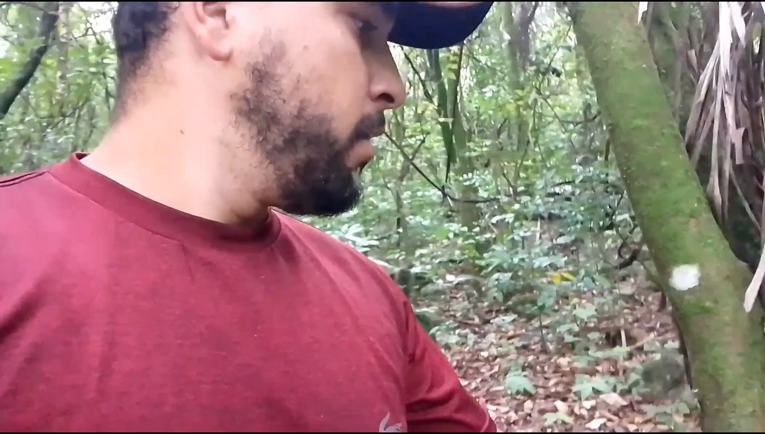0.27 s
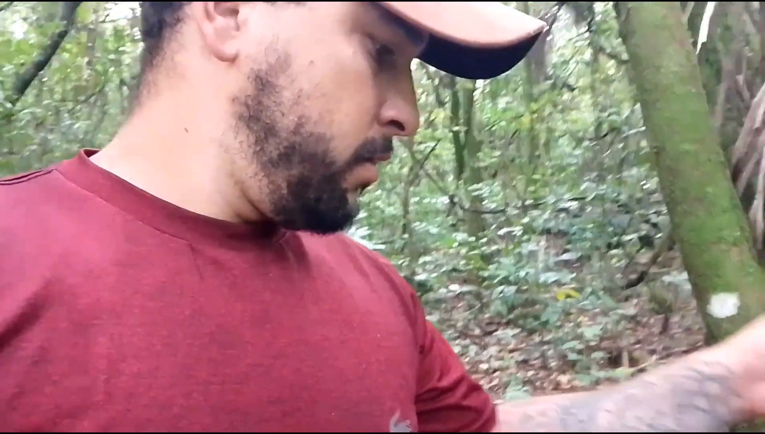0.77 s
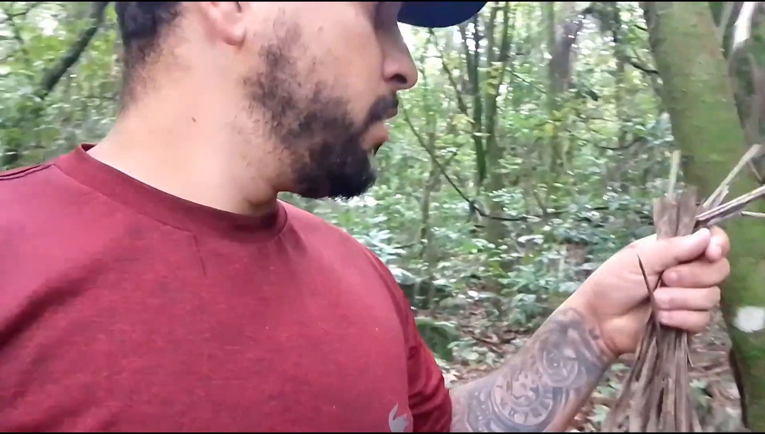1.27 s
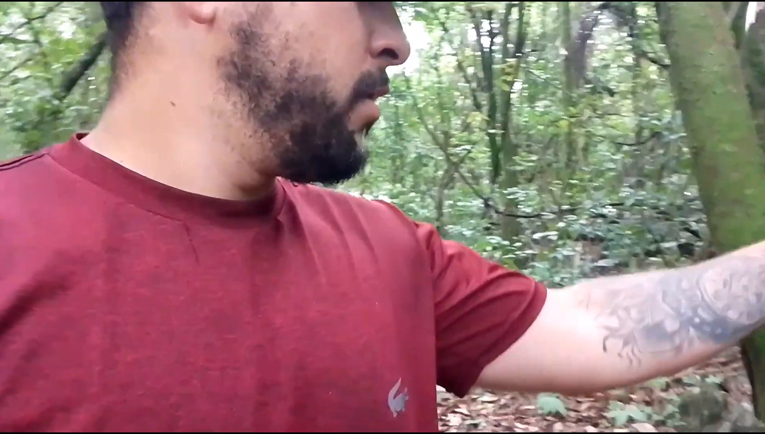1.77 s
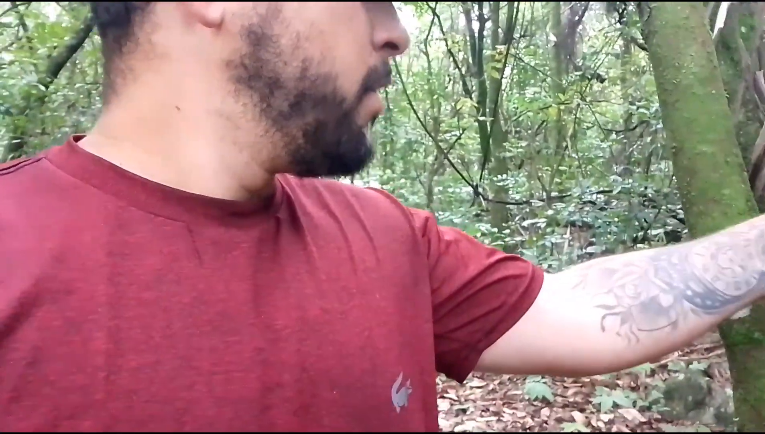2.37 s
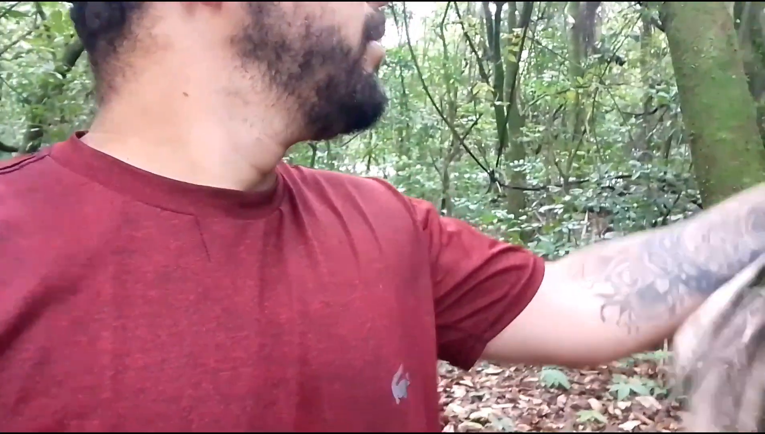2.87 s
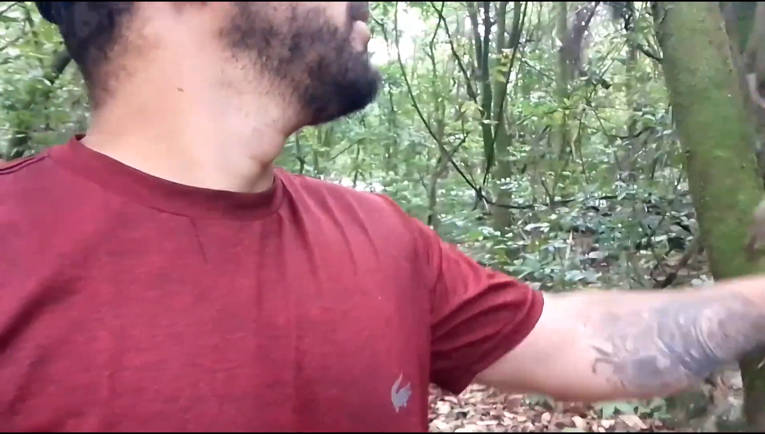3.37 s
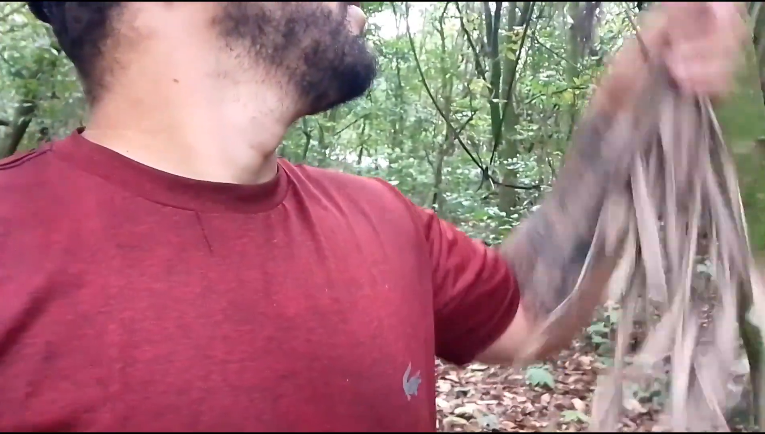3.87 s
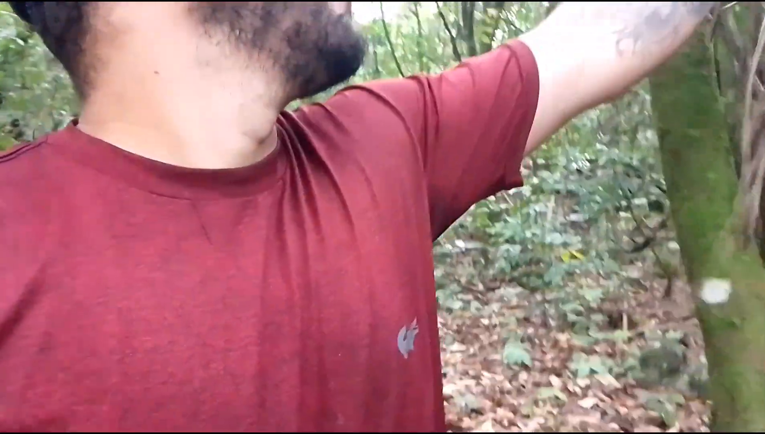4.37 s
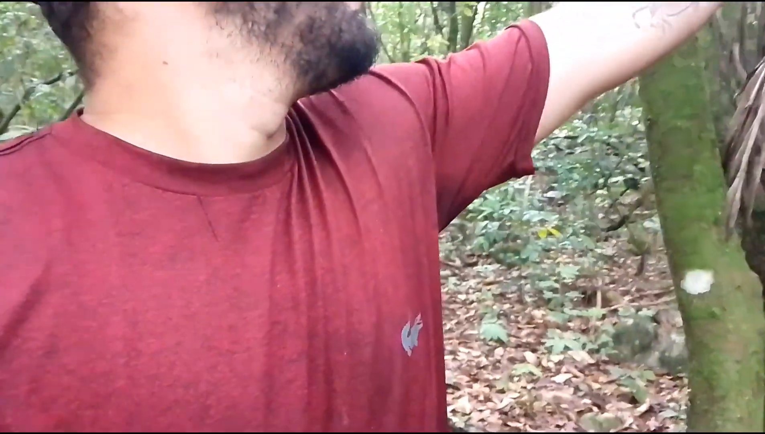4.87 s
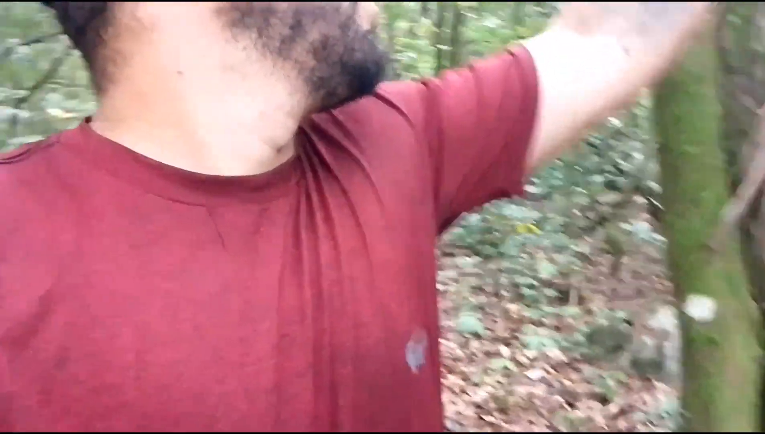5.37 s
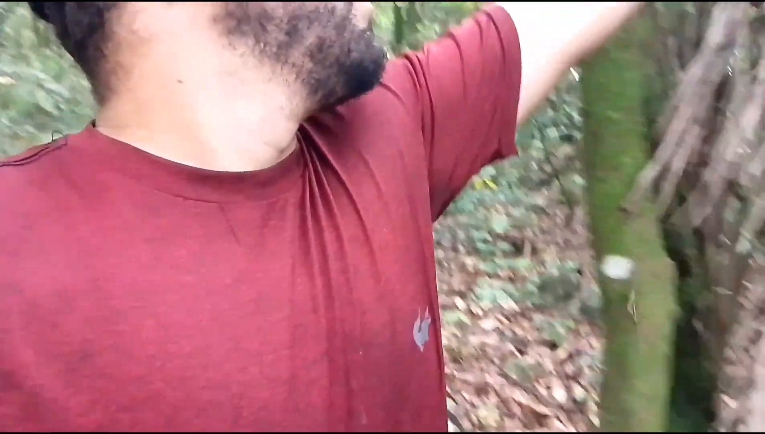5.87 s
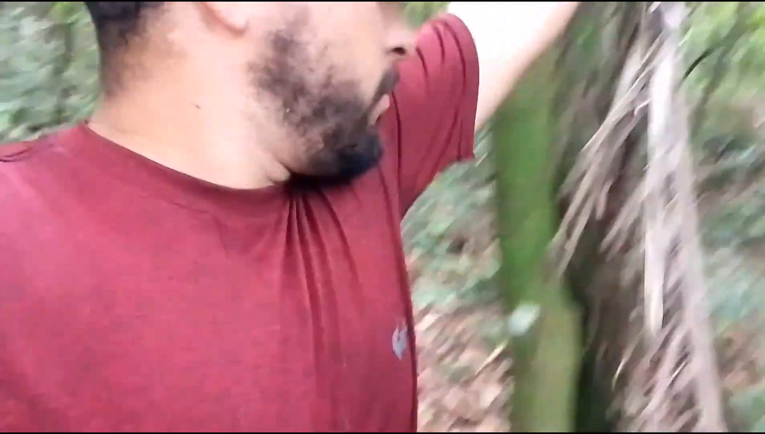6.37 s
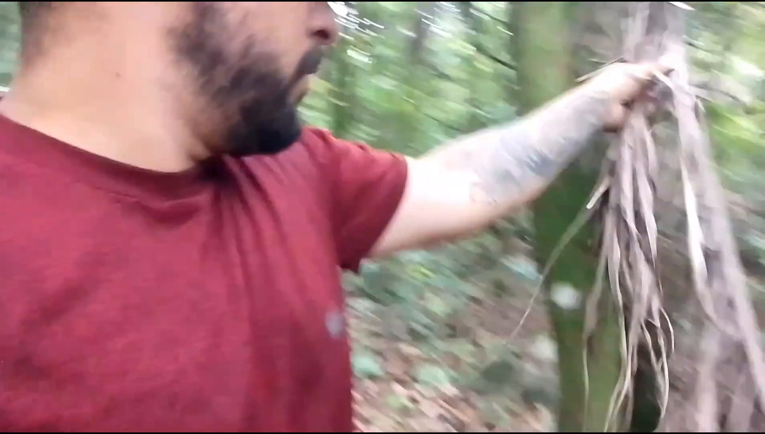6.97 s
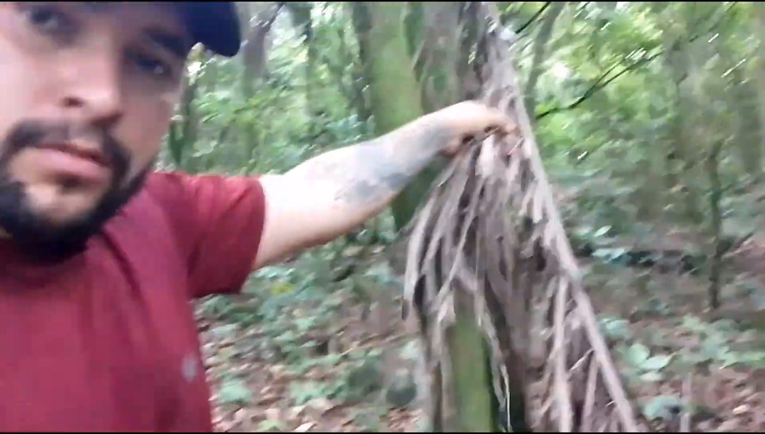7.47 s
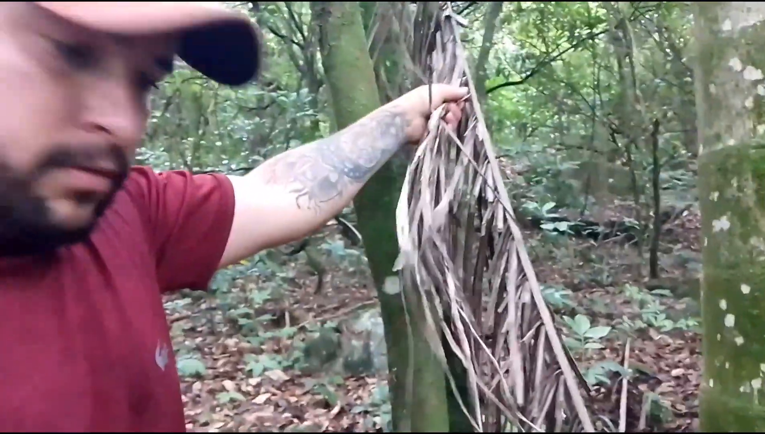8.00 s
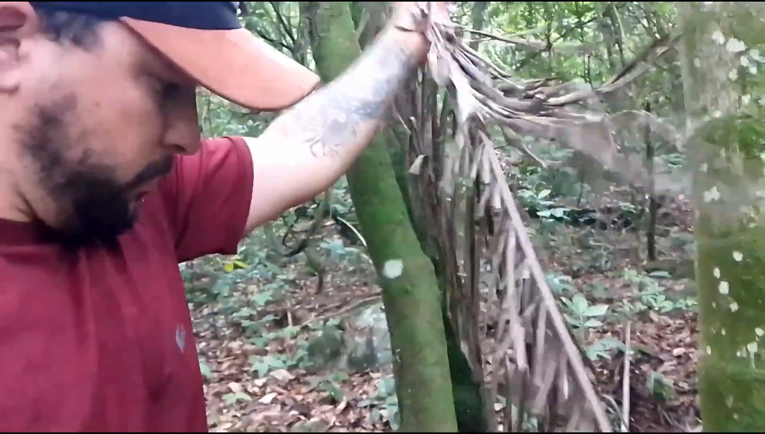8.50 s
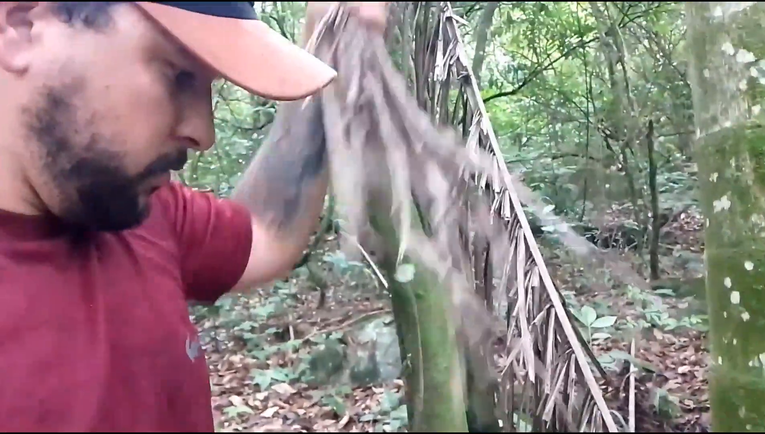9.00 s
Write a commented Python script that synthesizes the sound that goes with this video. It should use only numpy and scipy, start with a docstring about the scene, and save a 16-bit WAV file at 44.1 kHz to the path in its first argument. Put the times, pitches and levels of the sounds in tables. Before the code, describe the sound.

Stiff, dead leaves crinkle and break in uneven bursts, recorded near and dry in a calm forest. Hard, bright cracks cluster early, pause, return strongly, then thin into lighter snaps and rustles. A frond drags roughly over a trunk with a small woody knock, followed by delicate ticking and a final shake with one strong snap. Thin insect hiss and soft air sit far behind.

```python
"""Dry palm fronds are pulled and torn by hand in a forest: ribs break in sharp snaps of shaped noise, each with
a smaller fibre. Each pull swells and dies away as stiff leaflets buckle in ringing ticks and slide in a hiss.
Low-passed noise thuds under some loud snaps, and stalks knock as damped modes. A frond scrapes in noise bands,
a swept sine squeaks faintly, sparse echoes give a short tail, and filtered noise makes air and far insects."""
import sys
import numpy as np
from scipy import signal
from scipy.fft import rfft, irfft
from scipy.io import wavfile
from scipy.ndimage import uniform_filter1d

SR = 44100
rng = np.random.default_rng(int(sys.argv[2]) if len(sys.argv) > 2 else 0)


def unload_wav(signal):
    """Save mono or channel-first audio to the path in sys.argv[1] as 16-bit WAV at rate SR, clipped to [-1, 1]."""
    wavfile.write(
        sys.argv[1],
        SR,
        np.round(np.clip(np.atleast_2d(signal).T, -1, 1) * 32767).astype(np.int16),
    )


N = 407484

# breaking ribs: start_s, level_db (rms over 1 ms), ring_ms, body_db (boost around 1800-3600 Hz)
RIB_BREAKS = [(0.4668, -31, 1.5, 13), (0.515, -6.5, 2.4, 3.5), (0.5231, -16, 3.3, 12),
              (0.567, -8.5, 2, 9.5), (0.5774, -4.5, 2.3, 12.5), (0.596, -14.5, 1.4, 5),
              (0.606, -10.5, 3.3, 1), (0.674, -6, 2.6, 10), (0.7213, -8, 1.5, 11.5),
              (0.7672, -9.5, 1.7, 1.5), (0.7803, -18, 0.38, 6), (0.814, -18, 5.7, 10.5),
              (0.8778, -19, 3.7, 10.5), (0.9418, -24, 12, 17), (1.1607, -27.5, 4.6, 11.5),
              (1.2196, -26.5, 6.1, 11.5), (1.2919, -13.5, 2.2, 8), (2.2349, -20.5, 6.6, 11.5),
              (2.384, -29, 1.7, 11), (2.4868, -8.5, 2.6, 5), (2.5326, -12, 3, 6), (2.5702, -14.5, 0.52, 13),
              (2.5958, -10, 8.3, 9.5), (2.7108, -9, 1.3, 1.5), (2.7974, -16.5, 6.2, 12.5),
              (2.875, -6, 0.96, 15), (2.88, -5.5, 0.6, -1.5), (2.9001, -10.5, 1.8, 2),
              (2.94, -5.5, 1.4, 14), (2.9816, -5.5, 1.4, 7.5), (2.9936, -11, 1.4, -9),
              (3.005, -10.5, 1.2, 3.5), (3.155, -15.5, 7, 8), (3.1645, -13.5, 1.1, 10),
              (3.2434, -15.5, 3.8, 0.5), (3.26, -20.5, 2.3, 7), (3.5211, -4, 4.1, -2),
              (3.5432, -15.5, 0.89, -12), (3.601, -18.5, 8.4, 5), (4.1238, -36.5, 2, 2),
              (4.505, -28, 2.7, -18), (4.6685, -15, 1.8, -3.5), (4.9492, -25.5, 1.4, 5),
              (5.2101, -18, 1.2, -9.5), (5.239, -15.5, 2.4, 2), (5.2497, -13.5, 3.2, 5.5),
              (5.258, -9, 3.4, 2), (5.2678, -15, 1.7, 7), (5.2992, -11, 3, 3.5), (5.331, -10.5, 8, 8),
              (5.3375, -15.5, 2.3, 12.5), (5.961, -34, 1.46, -5), (6.328, -21, 2.4, -3),
              (6.3644, -17.5, 1.8, 4.5), (6.403, -16, 4.5, 3.5), (6.4252, -17, 0.8, 2),
              (6.4586, -14.5, 1.1, 11.5), (7.2814, -19.5, 2.9, -6), (7.3474, -25, 2.8, 1.5),
              (7.9536, -22, 0.59, 17), (8.0596, -26, 3.8, 16), (8.2386, -26.5, 1.6, 2),
              (8.4176, -27, 2.1, 9), (8.4336, -17, 1.6, 9.5), (8.4627, -14, 1.7, 5),
              (8.4805, -22, 2.2, 3.5), (8.5291, -26, 1.2, 15), (8.5925, -20, 1.8, 8),
              (8.5993, -7.5, 0.85, 9.5), (8.6797, -24.5, 0.78, 24)]
# stalks bumping: start_s, level_db, pitch_hz, t60_s
STALK_KNOCKS = [(5.416, -48.5, 368, 0.07), (5.766, -46, 1116, 0.17), (6.245, -48, 905, 0.025),
                (7.172, -27.5, 1880, 0.046), (7.437, -38.5, 590, 0.012), (8.947, -40, 1496, 0.066)]
# spectra of a snap, of the leaflets and of the forest air: frequency_hz, density_db (per Hz, relative)
SNAP_SPECTRUM = [(40, -33.5), (300, -38), (900, -24), (1450, -20), (2000, -12.5), (3400, -4.5),
                 (5200, -4.5), (6800, 1.5), (8500, 11), (10800, -3), (13000, -5.5), (15500, -31.5)]
LEAF_SPECTRUM = [(130, -57), (320, -30), (900, -30), (1700, -14), (2600, -13), (3800, -4.5), (5300, -11),
                 (7300, 0), (8700, 2), (10800, -13.5), (12600, -17.5), (15500, -33)]
AIR_SPECTRUM = [(40, -20.5), (75, 1), (120, -45), (170, -17.5), (300, -5), (550, -4), (1300, -9),
                (4000, -7.5), (8500, -10.5), (15000, -7.5)]
# hollow resonances of the hanging fronds: centre_hz, width_hz, boost_db
FROND_RESONANCES = [(780, 100, 5.5), (1110, 180, 4), (1580, 160, 2.5)]
# pulls and shakes of the bundle: height_s, level_db, swell_s, fade_s, body_db, fizz_db
BUNDLE_PULLS = [(0.02, -46, 0.24, .19, 1.5, 1), (0.42, -48, 0.12, 0.5, 7.5, 13),
                (0.601, -32, 0.073, 0.49, 5.5, 17), (0.942, -52.5, 0.093, 0.58, 1, -4),
                (1.225, -42, 0.022, .04, -7, -5), (1.31, -46.5, 0.048, 0.18, -1, 0),
                (1.85, -56, 0.51, 0.23, 3, 5), (2.24, -45.5, 0.27, 0.23, 3.5, -1),
                (2.54, -40.5, 0.17, 0.5, -2.5, -2), (2.83, -32.5, 0.075, 0.06, -9.5, 3),
                (2.99, -42.5, 0.09, 0.61, 8.5, 3.5), (3.155, -32, 0.078, 0.089, 2, 6),
                (3.299, -36, 0.11, 0.15, -1.5, 3), (3.532, -36, 0.23, 0.52, 5, 10.5),
                (4.135, -48, 0.02, 0.035, -1, 15), (4.255, -45.5, 0.057, 0.21, -7.5, -12),
                (4.515, -44.5, 0.043, 0.074, 4.5, 12), (4.681, -46, 0.16, 0.22, -1, 2),
                (4.971, -43.5, 0.13, 0.16, -10, -18), (5.22, -34, 0.18, .1, -11.5, -11),
                (5.408, -33.5, 0.2, 0.35, 3, 7.5), (6.14, -57.5, 0.17, 1, 3, -0.5),
                (6.37, -34, 0.095, 0.45, 1.5, 11), (6.47, -43, 0.11, 0.38, 6, 0),
                (6.99, -39.5, 0.34, 0.5, -9, 9.5), (7.3, -48.5, 0.17, 0.34, -13, 9),
                (7.469, -51.5, 0.084, 0.25, 11.5, 15), (7.64, -51, 0.049, 0.13, 25, 6),
                (7.75, -50.5, 0.067, 0.096, 17.5, 11), (7.96, -46.5, 0.055, 0.14, 13.5, 9),
                (8.06, -49.5, 0.081, 0.21, 11.5, 21), (8.22, -56.5, 0.3, 0.11, 4.5, 11),
                (8.48, -32, .06, 0.077, 2.5, 16), (8.668, -39.5, 0.39, 0.32, 5, 9.5),
                (8.94, -52, 0.2, 0.064, 25, 21)]
# low thuds under some of the loud snaps: start_s, peak_db
SNAP_THUDS = [(0.517, -44), (0.569, -61), (0.579, -44.5), (0.675, -38), (2.712, -58), (2.876, -47),
              (3.525, -50), (8.598, -57.5)]
# bands of a long frond dragged down the trunk: centre_hz, width_hz, level_db
SCRAPE_BANDS = [(760, 170, -6.5), (1275, 220, -1), (1740, 300, 1.5), (2370, 590, 1.5), (3780, 600, 2.5),
                (4230, 170, 7)]

FRAME, HOP = 512, 128  # samples
EDGE_HZ = 16000
# the bundle never lies quite still while it is held
HELD_DB, HELD_BODY_DB, HELD_FIZZ_DB, LET_GO_S = -65, 12, 1, 9.05
# a pull is SWING_DB down at the end of its swell or fade time; a ROUND above one rounds its top
SWING_DB, SWELL_ROUND, FADE_ROUND = 27, 1.8, 1.34
# the smaller fibre after each rib: median wait, mean level against the rib, its spread, median ring time
FIBRE_WAIT_S, FIBRE_DB, FIBRE_SPREAD_DB, FIBRE_RING_MS = 0.028, -18.5, 3, 3.3
# a thin rib radiates little bass by itself
RIB_BASS_DB, RIB_BASS_HZ = -22, 250


def amp(db):
    """Logarithmic level: decibels to amplitude gain."""
    return 10 ** (np.asarray(db) / 20)


def unit(x):
    """Normalisation: scales to an rms of one."""
    return x / np.sqrt(np.mean(x ** 2) + 1e-20)


def read(points, hz):
    """Interpolation: reads a spectrum in dB along a log-frequency axis."""
    f, db = np.transpose(points)
    return np.interp(np.log(hz + 1), np.log(f), db)


def band(hz, low_hz, high_hz, end_hz):
    """Band weighting: one from low_hz to high_hz, fading to zero an octave below and at end_hz."""
    return np.interp(np.log(hz + 1), np.log([low_hz / 2, low_hz, high_hz, end_hz]), [0, 1, 1, 0])


def add(mix, s, sound):
    """Superposition: mixes a sound in at time s."""
    part = mix[max(round(s * SR), 0):][:len(sound)]
    part += sound[:len(part)]


def causal(db):
    """Minimum phase: a response for a gain curve with a sharp front and the ringing after it."""
    mirrored_db = np.r_[db, db[-2:0:-1]]
    log_response = np.conj(signal.hilbert(np.log(amp(mirrored_db))))
    return np.exp(log_response)[:len(db)]


def drift(shape, spans):
    """Correlated randomness: a smooth field of rms one, with patches about spans cells wide."""
    field = rng.standard_normal(shape)
    for axis, span in enumerate(spans):
        for _ in range(2):
            field = uniform_filter1d(field, max(round(span), 1), axis, mode="wrap")
    return unit(field)


def forest(air_db=-69.0, insects_db=-71, insects_hz=5100, width_hz=160):
    """Stationary noise: still air, and the narrow steady hiss of distant insects."""
    hz = np.fft.rfftfreq(N, 1 / SR)
    air = irfft(rfft(rng.standard_normal(N)) * amp(read(AIR_SPECTRUM, hz)), N)
    insects = irfft(rfft(rng.standard_normal(N)) / (1 + ((hz - insects_hz) / width_hz) ** 4), N)
    return amp(air_db) * unit(air) + amp(insects_db) * unit(insects)


def trees(x, near_db=-19, near_t60=0.04, far_db=-25, far_t60=1.0, low_hz=900):
    """Scattering: ground and trunks return quick near echoes, then a faint tail."""
    t = np.arange(SR) / SR
    # 2500 echoes a second on average, none in the first 4 ms
    taps = rng.standard_normal(SR) * (rng.random(SR) < 2500 / SR) * (t > 0.004)
    taps = signal.sosfilt(signal.butter(1, low_hz, "high", fs=SR, output="sos"), taps)
    near, far = (taps * np.exp(-np.log(1000) * t / t60) for t60 in (near_t60, far_t60))
    echoes = amp(near_db) * near / np.linalg.norm(near) + amp(far_db) * far / np.linalg.norm(far)
    return signal.fftconvolve(x, echoes)[:N]


def drag(from_s=6.58, to_s=7.27, swell_s=0.067, fade_s=0.18, db=-53, catch_db=3.5, catch_s=0.014):
    """Stick-slip friction: a frond scrapes along the bark, and each band catches and slips by itself."""
    hz, now = np.fft.rfftfreq(N, 1 / SR), np.arange(N) / SR
    scrape = np.zeros(N)
    for centre_hz, width_hz, band_db in SCRAPE_BANDS:
        resonance = 1 / (1 + ((hz - centre_hz) / width_hz * 2) ** 2)
        noise = irfft(rfft(rng.standard_normal(N)) * resonance, N)
        scrape += noise * amp(band_db + catch_db * drift((N,), [catch_s * SR]))
    envelope = np.minimum(1 + (now - from_s) / swell_s, 1 - (now - to_s) / fade_s)
    return amp(db) * unit(scrape) * np.clip(envelope, 0, 1)


def squeak(start_s=6.1, length_s=0.066, from_hz=450, to_hz=620, db=-68, waver=0.071):
    """Frequency modulation: one faint, rising squeak, roughened by a wavering pitch."""
    out, u = np.zeros(N), np.linspace(0, 1, round(length_s * SR))
    hz = (from_hz + (to_hz - from_hz) * u) * (1 + waver * drift(u.shape, [100]))
    tone = np.sin(2 * np.pi * np.cumsum(hz) / SR)
    add(out, start_s, amp(db) * np.sin(np.pi * u) * tone)
    return out


def knocks(scuff=0.45, scuff_s=0.0054, rough_rad=0.97):
    """Impact: a bumped stalk rings in one damped, rattling mode, with a dull scuff around its pitch."""
    out, t = np.zeros(N), np.arange(SR // 4) / SR
    for s, db, hz, t60 in STALK_KNOCKS:
        push = rng.standard_normal(len(t)) * np.exp(-t / scuff_s)
        rub = signal.sosfilt(signal.butter(2, [hz / 2, hz * 2], "band", fs=SR, output="sos"), push)
        rattle = rough_rad * drift(t.shape, [120])
        mode = np.sin(2 * np.pi * hz * t + rattle) * np.exp(-np.log(1000) * t / t60)
        onset = 1 - np.exp(-t * hz)
        add(out, s, amp(db) * (mode / 2 * onset + scuff * rub / abs(rub).max()))
    return out


def thuds(decay_s=0.0035, top_hz=900, size=2048):
    """Low-passed noise: a short dull thud under a loud snap."""
    out, t = np.zeros(N), np.arange(size) / SR
    for s, db in SNAP_THUDS:
        burst = rng.standard_normal(size) * np.exp(-t / decay_s)
        thud = signal.sosfilt(signal.butter(2, top_hz, fs=SR, output="sos"), burst)
        add(out, s, amp(db) * thud / abs(thud).max())
    return out


def handling(t):
    """Power addition: level, body and fizz of the rustle in dB; the strongest pull dominates the colour."""
    s, db, swell_s, fade_s, body_db, fizz_db = np.transpose(BUNDLE_PULLS)
    since = t[:, None] - s
    swell, fade = abs(since / swell_s) ** SWELL_ROUND, abs(since / fade_s) ** FADE_ROUND
    pulled = amp(db - SWING_DB * np.where(since < 0, swell, fade))
    held = amp(HELD_DB) * np.interp(t - LET_GO_S, [0, 0.15], [1, 0.3])
    power = np.c_[pulled, held] ** 2
    total = power.sum(1)
    body = power @ np.r_[body_db, HELD_BODY_DB] / total
    fizz = power @ np.r_[fizz_db, HELD_FIZZ_DB] / total
    return 10 * np.log10(total), body, fizz


def crinkle(per_s=1900, spread_db=3.0, largest=5.2, ring_s=0.0014, mode_share=1.0, low_hz=1800, high_hz=12000,
            slide_db=-1, relax_s=0.062, clump_db=2.05, clump_s=0.0057, count=24, size=256):
    """Buckling and friction: leaflets tick at random, each with a short mode, over the hiss of sliding."""
    t, ticking = np.arange(size) / SR, np.zeros(N)
    for mode_hz in np.geomspace(low_hz, high_hz, count):
        ticks, at = np.zeros(N), rng.integers(0, N, round(per_s / count * N / SR))
        ticks[at] = amp(spread_db * np.minimum(rng.exponential(1, len(at)), largest))
        leaflet = rng.standard_normal(size) + mode_share * np.sin(2 * np.pi * mode_hz * t)
        ticking += signal.oaconvolve(ticks, unit(leaflet * np.exp(-t / ring_s)))[:N]
    # near a snap the bundle is strained and crackles; once slack, sliding joins in
    now = np.arange(N) / SR
    to_snap = abs(now[::HOP, None] - np.transpose(RIB_BREAKS)[0]).min(1)
    slack = np.interp(now, now[::HOP], 1 - np.exp(-to_snap / relax_s))
    sliding = slack * amp(slide_db) * rng.standard_normal(N)
    out = (unit(ticking) + sliding) * amp(clump_db * drift((N,), [clump_s * SR]))
    # even out the level over 41 ms, so that the pulls alone set the slow swells
    return out / np.sqrt(uniform_filter1d(out ** 2, round(0.041 * SR)) + 1e-9)


def rustle(blade_db=3.5, blade_hz=160, blade_s=0.15, touch_db=1.53, touch_hz=900, touch_s=0.013):
    """Resonant filtering: the bundle colours the crinkle finely, and fresh contacts shift the colour."""
    hz, t, z = signal.stft(crinkle(), SR, nperseg=FRAME, noverlap=FRAME - HOP)
    level_db, body_db, fizz_db = handling(t)
    bins_per_hz, frames_per_s = FRAME / SR, SR / HOP
    colour = read(LEAF_SPECTRUM, hz)[:, None]
    colour = colour + blade_db * drift(z.shape, [blade_hz * bins_per_hz, blade_s * frames_per_s])
    for centre_hz, width_hz, db in FROND_RESONANCES:
        colour += db * np.exp(-((hz - centre_hz) / width_hz) ** 2)[:, None]
    colour += touch_db * drift(z.shape, [touch_hz * bins_per_hz, touch_s * frames_per_s])
    colour += np.outer(band(hz, 550, 1300, 6000), body_db)
    colour += np.outer(np.interp(hz, [9000, 12000], [0, 1]), fizz_db)
    gain = amp(colour) / np.sqrt(np.mean(amp(colour) ** 2, 0))
    return signal.istft(z * gain * amp(level_db), nperseg=FRAME, noverlap=FRAME - HOP)[1][:N]


def strays(usual_db=-41, follow=0.93, spread_db=2.0, largest=3.35, ring_ms=1.0, body_db=2, count=220):
    """Random release: single leaflets flick, harder when the rustle is above its usual level."""
    when, size, colour = rng.random((count, 3)).T
    s = when * N / SR
    effort_db = handling(s)[0]
    db = usual_db + follow * (effort_db - effort_db.mean())
    db += spread_db * np.minimum(-np.log(size), largest)
    bodies_db = body_db + 10 * (colour - 0.5)
    return [(at, level, ring_ms, body) for at, level, body in zip(s, db, bodies_db)]


def fibres():
    """Load transfer: each breaking rib loads a thinner fibre, which snaps a moment later."""
    rows = []
    for s, db, _, body_db in RIB_BREAKS:
        wait, force, ring = rng.standard_normal(3)
        snap_s = s + FIBRE_WAIT_S * np.exp(wait / 2)
        level_db = db + FIBRE_DB + FIBRE_SPREAD_DB * force
        rows.append((snap_s, level_db, FIBRE_RING_MS * np.exp(ring / 2), body_db / 2))
    return rows


def snaps(rise_ms=0.19, crack_ms=0.2, ring_share=1.0, splinter_db=8.0, size_spread=0.089,
          modes_db=1.5, modes_hz=500, size=1024):
    """Brittle fracture: each fibre gives way in one crack; splinters and the leaf blade ring on for a few ms."""
    out, hz, ms = np.zeros(N), np.fft.rfftfreq(size * 2, 1 / SR), np.arange(size) * 1000 / SR
    for s, db, ring_ms, body_db in list(RIB_BREAKS) + fibres() + strays():
        noise, splinters = rng.standard_normal((2, size))
        splintering = amp(splinter_db * unit(uniform_filter1d(splinters, size=14)))
        ring = np.exp(-ms / max(ring_ms, 0.2)) * splintering
        force = noise * (1 - np.exp(-ms / rise_ms)) * (np.exp(-ms / crack_ms) + ring_share * ring)
        # wider blades ring lower
        colour = read(SNAP_SPECTRUM, hz * np.exp(size_spread * rng.standard_normal()))
        # and each has its own uneven set of modes
        colour += modes_db * drift(hz.shape, [modes_hz / hz[1]])
        colour += RIB_BASS_DB / (1 + (hz / RIB_BASS_HZ) ** 2)
        colour += body_db * band(hz, 1800, 3600, 6500)
        snap = irfft(rfft(force, size * 2) * causal(colour))
        # equal energy: an rms of one if it were all heard within 1 ms
        add(out, s, amp(db) * snap * np.sqrt(SR / 1000 / np.sum(snap ** 2)))
    return out


def scene():
    """Superposition: hits and squeak with their echoes, the rustle, the scrape and the forest."""
    hits = snaps() + thuds() + knocks() + squeak()
    return (hits + trees(hits) + rustle() + drag() + forest())[None]


def record(dry, ceiling=0.87):
    """Saturation and band limit: the loudest snaps are softly squashed, then low-passed at EDGE_HZ."""
    squashed = ceiling * np.tanh(dry / ceiling)
    low_pass = signal.firwin(255, EDGE_HZ, window=("kaiser", 9), fs=SR)
    return signal.oaconvolve(squashed, low_pass[None], "same")


dry = scene()
out = record(dry)
unload_wav(out)
```